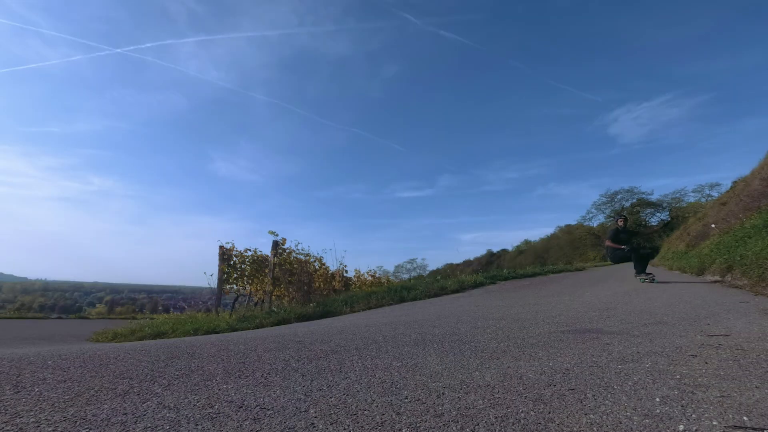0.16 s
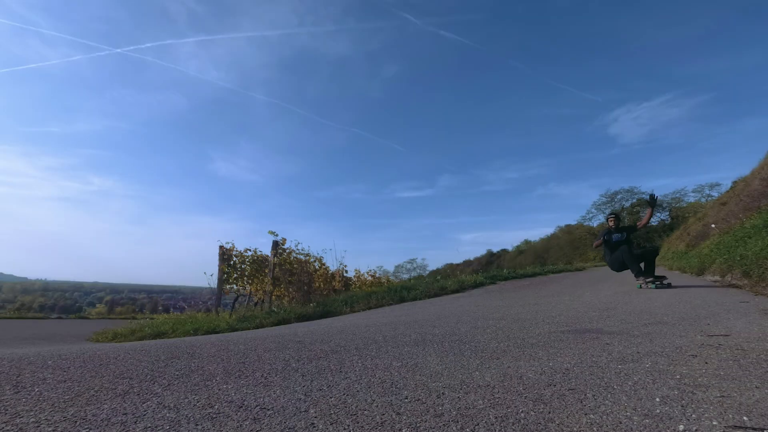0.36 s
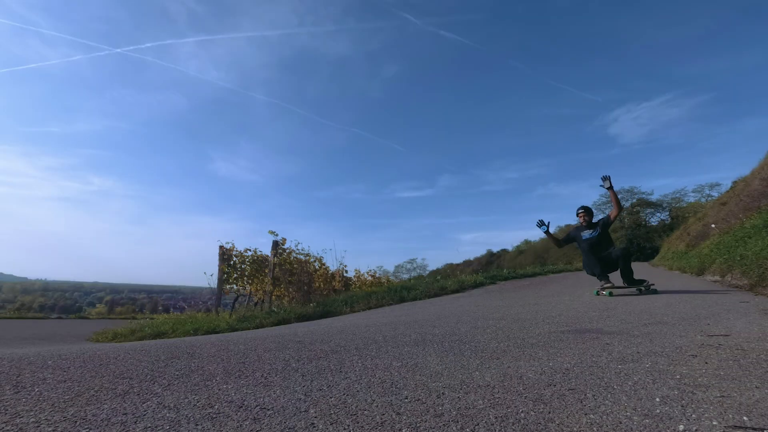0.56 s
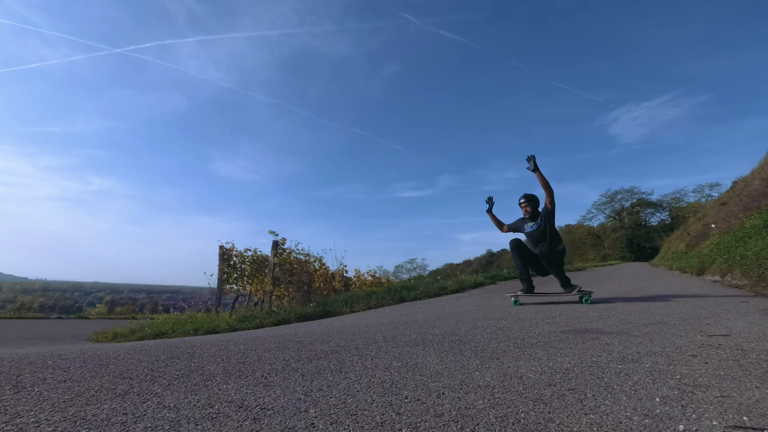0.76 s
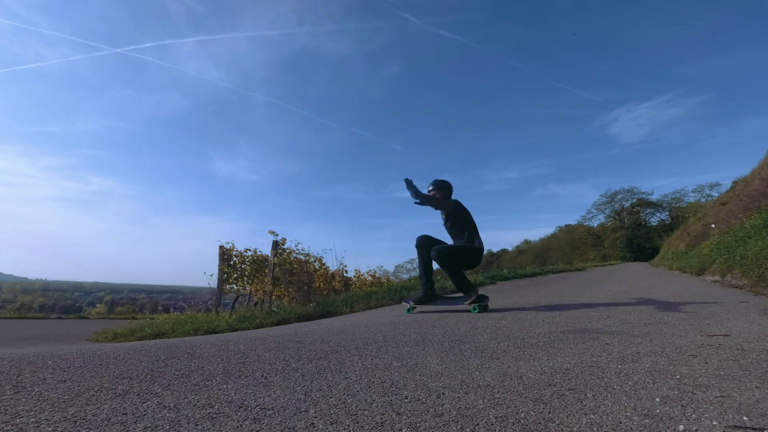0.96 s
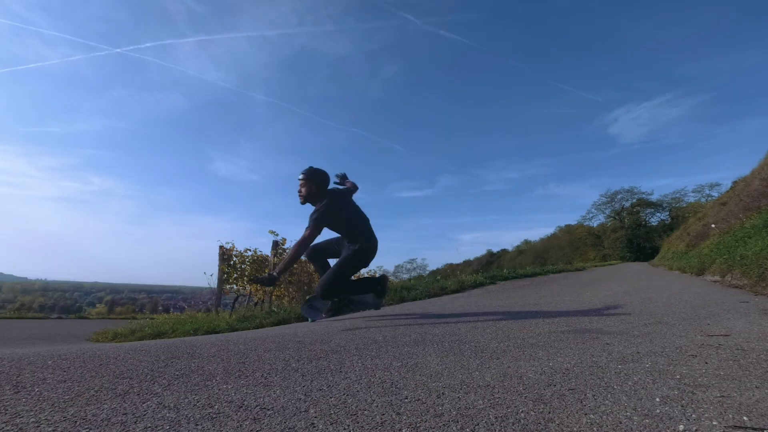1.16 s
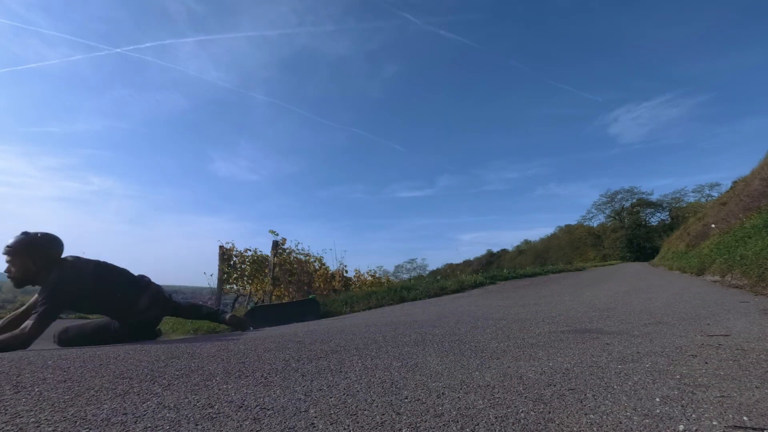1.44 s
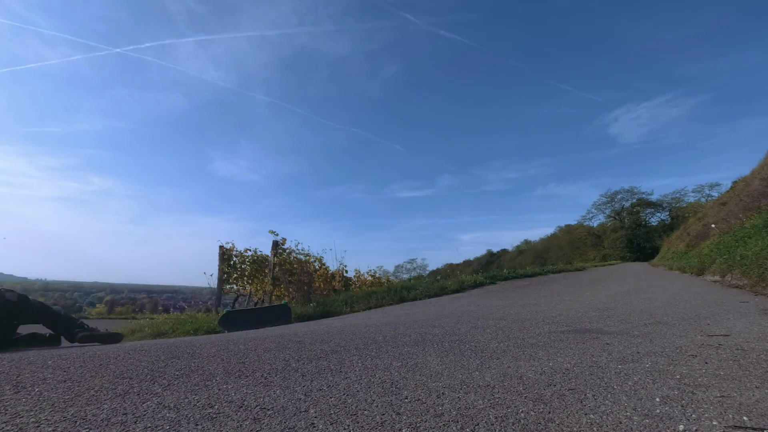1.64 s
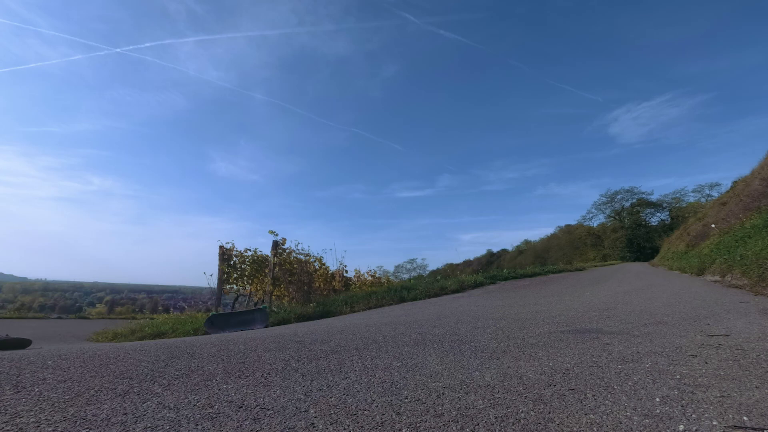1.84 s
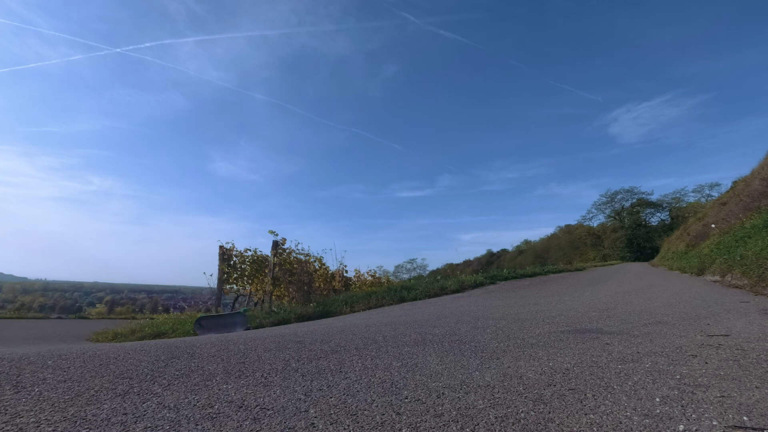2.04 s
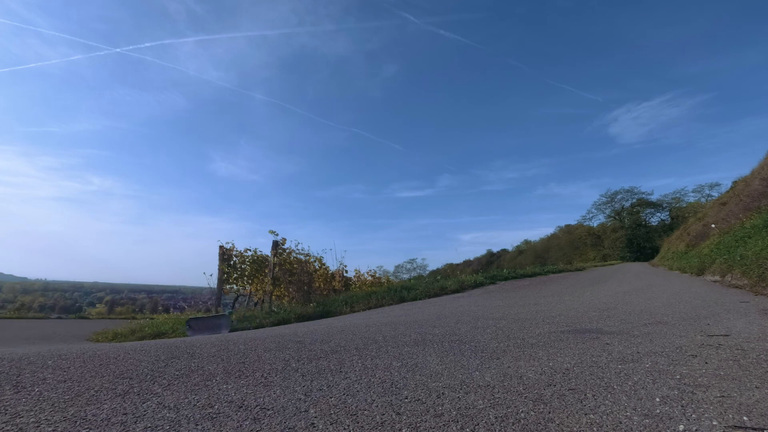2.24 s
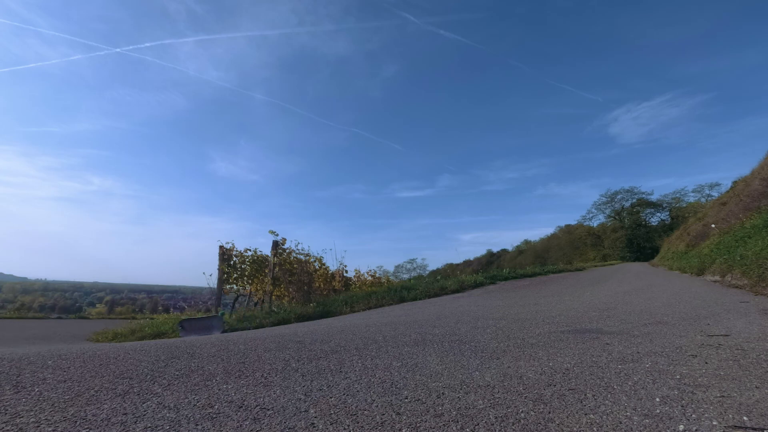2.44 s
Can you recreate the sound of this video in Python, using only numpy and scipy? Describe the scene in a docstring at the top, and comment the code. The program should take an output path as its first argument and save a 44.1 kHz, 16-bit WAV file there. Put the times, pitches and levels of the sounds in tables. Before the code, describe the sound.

A longboard slides on asphalt, its juddering hum and gritty hiss swelling as it nears, until about 1.1 seconds. At 1.3 seconds the rider falls close by with sharp knocks and hollow clonks, and gloves and pads scrape loudly, with more knocks until 1.7. From 1.5 seconds the board rasps along on its edge, thinning and sputtering out by 2.6 seconds. Faint wind lies underneath.

```python
"""A juddering hum and a swelling hiss of grit: a longboard slides sideways down an asphalt road, its
wheels sticking and slipping. They grip and throw the rider, who lands at 1.3 s with knocks and hollow
clonks and scrapes past on slide gloves and pads, while the board rasps away on its edge. Each scrape
is a stream of tiny impacts coloured by the part that rubs. Two close microphone ports on the ground
hear it all in a light wind."""
import sys
import numpy as np
from scipy import signal
from scipy.fft import rfft, irfft
from scipy.io import wavfile

SR = 44100
rng = np.random.default_rng(int(sys.argv[2]) if len(sys.argv) > 2 else 0)


def digitize_waveform(pressure):
    """Quantize a signal to 16-bit integers and store it at the path in sys.argv[1].

    Rows of a 2-D input are taken as channels; values are limited to [-1, 1].
    """
    field = np.atleast_2d(pressure).T
    bounded = np.clip(field, -1, 1)
    quanta = np.round(bounded * 32767).astype(np.int16)
    wavfile.write(sys.argv[1], SR, quanta)


N = 114660
T = np.arange(N) / SR
HZ = np.fft.rfftfreq(N, 1 / SR)
CATCH_RISE_S, KNOCK_RISE_S = 0.0016, 0.00018

# stereo image of the road close by: f/Hz, scatter/dB, left lead/rad, left minus right/dB
NEAR_IMAGE = [(300, -30, .05, -.3), (700, -27, .15, -1), (1600, -17, .62, -2), (2450, -13, 1.7, -2),
              (3200, -7, 1.2, -1), (4300, -8, 3.1, 0), (5300, -6, 5.7, -2), (6800, -3, 6, -4),
              (8300, -8, 7.5, -1), (10000, -3, 8.5, -6), (16000, -2, 6.5, -6)]


def amp(db):
    return 10 ** (np.asarray(db) / 20)


def unit(x):
    return x / np.sqrt(np.mean(x ** 2) + 1e-20)


def curve(rows, column=1):
    """Fader ride from a dB column; muted before a start later than 0.5 s and after an end before 2 s."""
    rows = np.array(rows)
    before = -120 if rows[0, 0] > .5 else None
    after = -120 if rows[-1, 0] < 2 else None
    return amp(np.interp(T, rows[:, 0], rows[:, column], left=before, right=after))


def across(rows, column=1):
    """One column of a table, spread over log frequency."""
    rows = np.array(rows)
    return np.interp(np.log(HZ + 1), np.log(rows[:, 0]), rows[:, column])


def colour(x, rows):
    """Minimum-phase EQ: clicks ring after they land."""
    cepstrum = irfft(np.log(amp(across(rows))), N)
    cepstrum[1:N // 2] *= 2
    cepstrum[N // 2 + 1:] = 0
    return irfft(rfft(x) * np.exp(rfft(cepstrum)), N)


def low_cut(x, hz):
    """Small contacts radiate little bass."""
    return signal.sosfilt(signal.butter(2, hz, "high", fs=SR, output="sos"), x)


def noise(eq):
    """Two channels of coloured noise at unit level."""
    return unit(colour(rng.standard_normal((2, N)), eq))


def wobble(rate_hz):
    """Random flutter centred on a rate."""
    ratio = HZ / rate_hz
    return unit(irfft(rfft(rng.standard_normal(N)) * ratio ** 2 / (1 + ratio ** 4), N))


def stones(per_s, spread_db, wash):
    """Two trains of tiny impacts of uneven size over a wash of finer ones."""
    sizes = amp(spread_db * np.minimum(rng.exponential(1, (2, N)), 4))
    clicks = sizes * rng.choice([-1, 1], (2, N)) * (rng.random((2, N)) < per_s / SR)
    return unit(unit(clicks) + wash * rng.standard_normal((2, N)))


def ring(x, hz, width_hz):
    """A damped resonance."""
    radius = np.exp(-np.pi * width_hz / SR)
    return signal.lfilter([1, 0, -1], [1, -2 * radius * np.cos(2 * np.pi * hz / SR), radius ** 2], x)


def blow(start, rise, decay):
    """Envelope of a hit: quick attack, exponential tail."""
    t = np.maximum(T - start, 0)
    return (1 - np.exp(-t / rise)) * np.exp(-t / decay)


def tone(start, rise, decay, hz):
    """One damped mode, set going by a cushioned blow."""
    return blow(start, rise, 2 * decay) ** 2 * np.sin(2 * np.pi * hz * (T - start))


def contact(start, rise, decay, hz, width):
    """A cluster of micro-impacts rings one broad resonance; width is a share of the pitch."""
    envelope = blow(start, rise, decay)
    burst = rng.standard_normal((2, N)) * envelope
    rung = ring(ring(burst, hz, hz * width), hz, 2 * hz * width)
    return rung * np.linalg.norm(envelope) / np.linalg.norm(rung, axis=1, keepdims=True)


def drone(rows, width_hz):
    """A rough resonance: a band of noise gliding in level and pitch."""
    times, _, hz = np.transpose(rows)
    carrier = np.exp(2j * np.pi * np.cumsum(np.interp(T, times, hz)) / SR)
    real, imag = irfft(rfft(rng.standard_normal((2, 2, N))) / (1 + (HZ / width_hz) ** 2) ** 4, N)
    return unit(((real + 1j * imag) * carrier).real) * curve(rows)


def ports(pair, image):
    """Stereo placement: the first signal reaches both ports, the second is scatter between them."""
    short_waves = HZ ** 2 / (HZ ** 2 + 260 ** 2)  # well below 260 Hz both ports hear alike
    scatter = short_waves * amp(across(image, column=1))
    lead = np.exp(.5j * short_waves * across(image, column=2))
    tilt = amp(short_waves * across(image, column=3) / 2)
    shared, apart = rfft(pair) / np.sqrt(1 + scatter ** 2)
    left = (shared + scatter * apart) * lead * tilt
    right = (shared - scatter * apart) / lead / tilt
    return irfft(np.array([left, right]), N)


def air():
    """A bed of open-air hush, with light wind buffeting each port separately."""
    # tone of the hush: f/Hz, level/dB
    hush_eq = [(20, -13), (50, -47), (90, 8), (200, -1), (600, -24), (2000, 19), (8000, 7.5), (16000, 0)]
    hush = ports(noise(hush_eq) * amp(2.1 * wobble(rate_hz=4.9)), NEAR_IMAGE)
    buffet = noise([(25, -9), (70, -1), (300, 1), (3000, -67)])
    return amp(-64) * hush + amp(-82) * buffet


def board():
    """The deck's edge rasps toward the verge, ringing the wood; it thins and sputters as it slows."""
    # fader of the skid: t/s, level/dB
    skid_level = [(1.45, -71), (1.53, -28), (1.565, -30.5), (1.63, -30.5), (1.7, -37), (1.745, -31.5),
                  (1.79, -34), (1.9, -39), (2.05, -37), (2.12, -48.5), (2.2, -42.5), (2.28, -37.5),
                  (2.35, -42), (2.39, -45), (2.52, -46), (2.6, -57)]
    # tone of the scraping edge: f/Hz, level/dB
    edge_eq = [(50, -41), (200, -10.5), (600, -3), (1200, -4), (1800, 1), (2350, 4.5), (2900, -9),
               (3900, -3), (4800, -14), (6000, -31), (7800, -24), (10500, -23), (15500, -52)]
    # modes of the wooden deck: f/Hz, level/dB
    deck_modes = [(538.3, -74), (651.4, -46), (839.8, -54), (920.5, -55), (1233, -59), (1513, -67),
                  (2186, -50), (2557, -45)]
    # the edge digging in: t/s, level/dB, f/Hz, decay/s
    dig_hits = [(1.62, -28.5, 2220, 0.04), (1.732, -21, 2260, 0.011), (1.801, -31, 2070, 0.019),
                (1.932, -31.5, 560, 0.029), (2.031, -33.5, 2210, 0.044), (2.143, -36, 910, 0.013),
                (2.265, -36, 2120, 0.051), (2.465, -42, 2300, .02)]
    # grit flicked up by the edge: t/s, level/dB
    flick_hits = [(1.836, -44.5), (2.008, -44), (2.045, -43.5), (2.144, -47), (2.476, -56.5)]
    # tone of that grit: f/Hz, level/dB
    flick_eq = [(3000, -19), (6000, -14), (7800, -3), (10500, 1.5), (15000, -25)]
    # stereo image of the verge: f/Hz, scatter/dB, left lead/rad, left minus right/dB
    verge_image = [(300, -29, .06, -.3), (700, -26, .18, -1), (1500, -18, .6, -4), (2300, -17, 1.8, -8.5),
                   (2800, -12, 2.2, -4), (3200, -5, 1.5, -2), (4200, -13, 3, -4), (5800, -3, 5.5, -2),
                   (7800, -3, 6.3, 2), (10500, -3, 10, -7), (16000, -2, 12, -7)]
    rasp = stones(per_s=2000, spread_db=3.5, wash=0.91) * amp(1.86 * wobble(rate_hz=50))
    wood = unit(sum(amp(db) * ring(rasp, hz, width_hz=23) for hz, db in deck_modes))
    digs = sum(amp(db) * contact(t, 0.005, decay, hz, width=0.14) for t, db, hz, decay in dig_hits)
    flicks = unit(colour(stones(per_s=2900, spread_db=4, wash=0.26), flick_eq))
    flicks *= sum(amp(db) * blow(t, CATCH_RISE_S, decay=0.021) for t, db in flick_hits)
    full = unit(colour(rasp, edge_eq)) + amp(-16) * wood
    sputter = amp(-0.5) * unit(low_cut(full, hz=1070) * amp(2.7 * wobble(rate_hz=14)))
    slowed = np.clip((T - 2.4) / 0.21, 0, 1)  # crossfade to the sputter from 2.4 s
    skid = full * np.sqrt(1 - slowed) + sputter * np.sqrt(slowed)
    return ports(skid * curve(skid_level) + digs + flicks, verge_image)


def impacts():
    """The fall: hard gear cracks on the road, hollow pad shells clonk and the body thumps."""
    # gear and board striking the road: t/s, level/dB, f/Hz, decay/s, relative crack/dB
    knocks = [(1.2803, -28, 2000, 0.0023, -2), (1.302, -17, 1730, 0.0029, -8),
              (1.312, -21.5, 2350, 0.018, -10), (1.4407, -20.5, 1620, 0.0058, 2.5),
              (1.448, -26, 820, 0.0076, -2), (1.5188, -15, 2220, 0.003, -26),
              (1.57, -15.5, 1660, 0.0033, -18), (1.673, -17, 990, 0.0011, -18),
              (1.7022, -15, 910, 0.001, 2.5)]
    # pad shells slapping down: t/s, level/dB, f/Hz, decay/s
    clonks = [(1.283, -16, 814, 0.0042), (1.3035, -14, 675, 0.009), (1.327, -14, 454, 0.0051),
              (1.444, -18, 900, .006), (1.462, -7.5, 760, 0.0027), (1.573, -6.5, 653, 0.0017)]
    # soft body hits: t/s, level/dB, f/Hz, decay/s
    thumps = [(1.186, -36.5, 150, 0.012), (1.19, -28, 278, 0.0037), (1.263, -39, 144.3, 0.0098),
              (1.33, -45, 182, 0.056), (1.44, -47, 72, 0.022), (1.44, -26, 271, 0.011),
              (1.638, -37, 235, 0.012), (1.697, -41.5, 158, 0.033), (1.818, -47, 170, 0.022),
              (1.949, -41.5, 298, 0.015)]
    clonk_rise_s, thump_rise_s = 0.00085, 0.0021
    hits = np.zeros((2, N))
    crack_noise = noise([(70, -12), (200, 0), (1000, 15.5), (4000, 2), (10000, -1.5), (15000, -14)])
    for t, db, hz, decay, crack_db in knocks:
        crack = amp(crack_db) * crack_noise * blow(t, KNOCK_RISE_S, decay)
        hits += amp(db) * (contact(t, KNOCK_RISE_S, decay, hz, width=0.49) + crack)
    hits = low_cut(hits, hz=170)
    # clonks and thumps feed only the signal that both ports share
    for t, db, hz, decay in clonks:
        overtone = amp(-8) * tone(t, clonk_rise_s, decay, 1.8 * hz)
        hits[0] += amp(db) * (tone(t, clonk_rise_s, decay, hz) + overtone)
    for t, db, hz, decay in thumps:
        hits[0] += amp(db) * tone(t, thump_rise_s, decay, hz)
    return ports(hits, NEAR_IMAGE)


def rider():
    """Plastic glove pucks and pads chatter across the asphalt with the body's weight on them."""
    # faders of the scrape: t/s, chatter/dB, hiss/dB
    scrape_levels = [(1.277, -55, -86), (1.282, -36, -33), (1.298, -24.5, -37), (1.312, -28.5, -31.5),
                     (1.345, -29, -30), (1.38, -26, -32), (1.425, -27, -39.5), (1.455, -26.5, -36),
                     (1.54, -26, -35), (1.565, -27.5, -42), (1.6, -34.5, -42.5), (1.72, -36.5, -42),
                     (1.85, -38, -58.5), (1.96, -38, -49), (2.12, -38, -53), (2.33, -50, -74),
                     (2.39, -59, -69), (2.6, -52, -89)]
    # tone of the chattering pads: f/Hz, level/dB
    chatter_eq = [(40, -43), (100, -25), (180, -29), (280, -6.5), (450, -1.5), (750, 0.5), (1200, 3.5),
                  (1700, 1), (2400, -3), (2900, -16.5), (3700, -4.5), (4700, -20.5), (8000, -25.5)]
    # tone of their hiss: f/Hz, level/dB
    hiss_eq = [(150, -55), (1500, -9), (3500, 8.5), (5000, -1), (6600, -9.5), (8400, 1), (10800, -7.5),
               (12000, -14), (15500, -27)]
    # low rumble of the sliding body: t/s, level/dB
    rumble_level = [(1.15, -85), (1.3, -53.5), (1.45, -49.5), (1.58, -59), (1.7, -59), (1.85, -60),
                    (2.33, -67), (2.6, -83)]
    # tone of that rumble: f/Hz, level/dB
    rumble_eq = [(25, -13), (50, -25), (70, 6), (100, -12), (135, 3), (170, 13.5), (220, 8), (400, -19)]
    # rough squeal of a glove puck: t/s, level/dB, f/Hz
    squeal = [(1.33, -68, 1001), (1.362, -30, 1077), (1.382, -29.5, 1282), (1.41, -34, 1083),
              (1.435, -30, 895.6), (1.46, -27, 801.4), (1.5, -34.5, 790), (1.56, -56, 935),
              (1.62, -69, 870)]
    coarse = stones(per_s=2200, spread_db=3.0, wash=0.85) * amp(1.3 * wobble(rate_hz=72))
    fine = stones(per_s=2400, spread_db=3.0, wash=1.0) * amp(1.3 * wobble(rate_hz=38))
    chatter = unit(colour(coarse, chatter_eq)) * curve(scrape_levels)
    hiss = unit(colour(fine, hiss_eq)) * curve(scrape_levels, column=2)
    rumble = noise(rumble_eq) * curve(rumble_level)
    return ports(chatter + hiss + rumble + drone(squeal, width_hz=440), NEAR_IMAGE)


def wheels():
    """Urethane sticks and slips over the stones, humming and spraying grit as it comes down close."""
    # fader of the sliding wheels: t/s, level/dB
    slide_level = [(0, -46), (.15, -40), (.33, -36), (.5, -34.5), (.72, -32.5), (.752, -39), (.77, -27.5),
                   (.85, -33.5), (1.01, -32), (1.04, -34), (1.1, -42.5), (1.12, -51.5), (1.138, -46),
                   (1.158, -37.5), (1.19, -52), (1.27, -49.5), (1.3, -48)]
    # tone of the slide: f/Hz, level/dB
    slide_eq = [(40, -63), (110, -28.5), (200, -28), (320, -19.5), (420, -6), (490, -5), (590, -4.5),
                (800, -7), (1150, -10.5), (1500, -11.5), (1900, -47), (3000, -33), (8000, -43)]
    # grit hissing under the wheels: t/s, level/dB
    grit_level = [(0, -62), (.3, -52), (.55, -43.5), (.76, -37), (.83, -38.5), (1, -42), (1.1, -48.5),
                  (1.12, -58), (1.27, -69), (1.3, -102)]
    # tone of the grit: f/Hz, level/dB
    grit_eq = [(100, -63), (600, -5), (1800, 4), (2700, -0.5), (3800, -1.5), (5200, -5), (7000, -8),
               (8200, -4), (10500, -10), (15500, -10)]
    # sudden sprays of grit: t/s, level/dB
    spray_hits = [(0.763, -29), (1.093, -34)]
    # wheels catching and letting go: t/s, level/dB, f/Hz, decay/s
    catch_hits = [(0.378, -30.5, 496, 0.0091), (0.546, -18, 473, 0.0059), (0.604, -17.5, 460, 0.0084),
                  (.625, -28, 780, 0.019), (0.669, -26.5, 730, 0.036), (0.698, -21.5, 523, 0.014),
                  (0.7622, -18.5, 682, 0.0078), (0.801, -29, 520, 0.0043), (1.059, -32.5, 1710, 0.012),
                  (1.093, -23, 864, 0.0055), (1.142, -30, 920, 0.0071), (1.231, -33.5, 1470, 0.0036)]
    # pebbles cracking out from under them: t/s, level/dB, f/Hz
    pebble_hits = [(.632, -29.5, 3440), (0.656, -32, 3300), (.675, -33, 3400), (0.743, -29, 2940),
                   (.765, -27, 3500), (.773, -25, 4170), (.793, -28.5, 3000), (.878, -28.5, 4100),
                   (0.939, -34, 3480), (0.963, -28.5, 3170), (.978, -37, 2870), (.992, -30.5, 3820),
                   (1.042, -38, 2820), (1.081, -32, 2600)]
    # band of tread hiss, sinking in pitch as the board nears: t/s, level/dB, f/Hz
    sizzle = [(0, -65, 5300), (.4, -57, 5360), (.7, -46, 5160), (.85, -43.5, 4440), (1.09, -62, 4150),
              (1.13, -80, 4200)]
    # stick-slip hum: t/s, level/dB, f/Hz
    hum = [(0, -46, 540), (.2, -41.5, 530), (.36, -33.5, 490), (.48, -32, 465), (.55, -31, 480),
           (.66, -35, 490), (.72, -35, 500), (.86, -32, 490), (1, -35.5, 470), (1.06, -71, 440),
           (1.15, -76, 440)]
    # drone of the flexing deck: t/s, level/dB, f/Hz
    flex = [(0, -68, 270), (.5, -54, 279.2), (.72, -47.5, 225.2), (.85, -50, 255.6), (.98, -47.5, 269.2),
            (1.07, -54, 260.4), (1.16, -55.5, 243.4), (1.24, -66, 241), (1.35, -68, 240)]
    # low drone of rolling: t/s, level/dB, f/Hz
    roll = [(0, -72, 112), (.14, -72, 106.7), (.35, -63, 94.2), (.6, -77, 98), (1.2, -78, 91.7),
            (1.35, -95, 90.6)]
    # stereo image of the road uphill: f/Hz, scatter/dB, left lead/rad, left minus right/dB
    uphill_image = [(500, -33, 0, 0), (1000, -29, 0, 0), (1450, -17, .3, 2), (1680, -12, 1.4, 1),
                    (1900, -9, 3.6, -3), (2600, -8.5, 5.4, -7), (4100, -8, 8.3, 0), (5200, -10, 10.6, -2),
                    (7000, -4, 11.7, -1), (8300, -4, 9, 3), (10000, -3, 8.4, -4), (16000, -2, 7, -5)]
    pass_s, pass_spread_s, pebble_decay_s = 1.084, 0.0065, 0.0018
    judder = wobble(rate_hz=31)
    coarse = stones(per_s=2500, spread_db=2.5, wash=0.58) * amp(0.8 * judder)
    fine = stones(per_s=1700, spread_db=1.5, wash=0.59) * amp(0.38 * judder + 1.2 * wobble(rate_hz=64))
    sprays = sum(amp(db) * blow(t, CATCH_RISE_S, decay=0.0038) for t, db in spray_hits)
    slide = unit(colour(coarse, slide_eq)) * curve(slide_level)
    grit = unit(colour(fine, grit_eq)) * (curve(grit_level) + sprays)
    catches = sum(amp(db) * contact(t, CATCH_RISE_S, decay, hz, width=0.22)
                  for t, db, hz, decay in catch_hits)
    pebbles = sum(amp(db) * contact(t, KNOCK_RISE_S, pebble_decay_s, hz, width=0.38)
                  for t, db, hz in pebble_hits)
    treble = grit + pebbles + drone(sizzle, width_hz=1700)
    mids = slide + catches + drone(hum, width_hz=150) + drone(flex, width_hz=133)
    mix = low_cut(mids + treble, hz=48) + drone(roll, width_hz=65)
    arrived = (1 + np.tanh((T - pass_s) / pass_spread_s)) / 2
    return ports(mix, uphill_image) * (1 - arrived) + ports(mix, NEAR_IMAGE) * arrived


def scene():
    return wheels() + rider() + impacts() + board() + air()


def record(dry):
    """The microphone notches the treble, adds a faint electronic whine and cuts off the very top."""
    # microphone response: f/Hz, level/dB
    mic_eq = [(20, -3), (10800, 0.5), (11700, -10), (12150, -34), (12850, -28), (13300, -30), (14200, -2),
              (15500, -5)]
    whine_hz = 13140 + 35 * wobble(rate_hz=45)
    whine = amp(-71) * unit(np.sin(2 * np.pi * np.cumsum(whine_hz) / SR))
    heard = colour(dry, mic_eq) + whine * amp([[-7], [2]])  # the whine sits to the right
    high_cut = signal.firwin(511, 15900, window=("kaiser", 9), fs=SR)
    return signal.oaconvolve(heard, high_cut[None], "same")


dry = scene()
out = record(dry)
digitize_waveform(out)
```